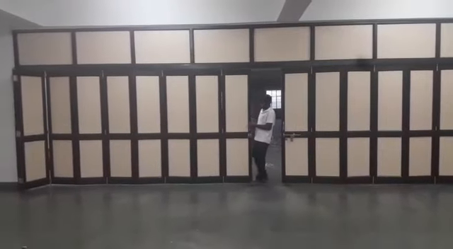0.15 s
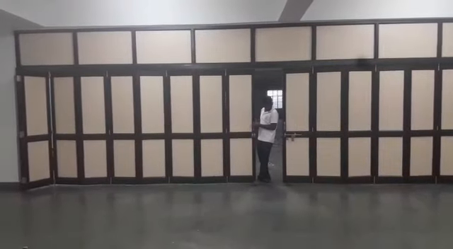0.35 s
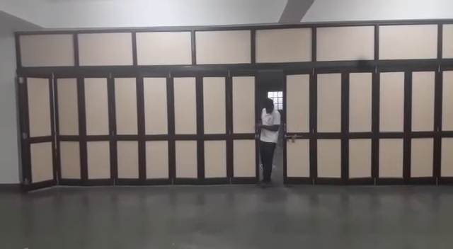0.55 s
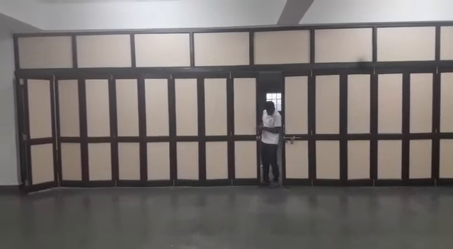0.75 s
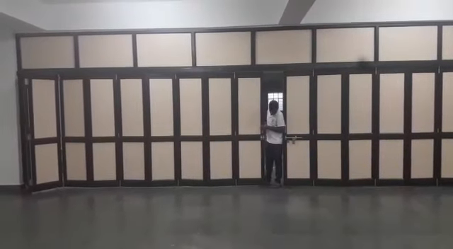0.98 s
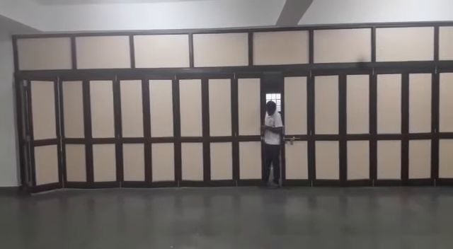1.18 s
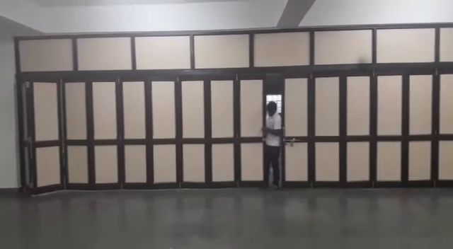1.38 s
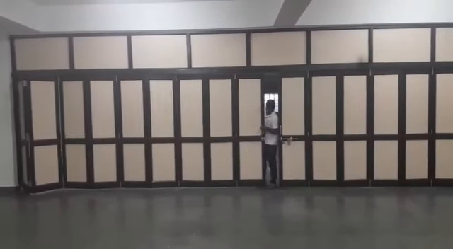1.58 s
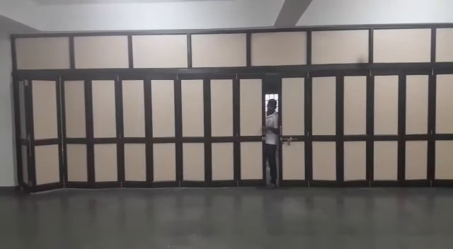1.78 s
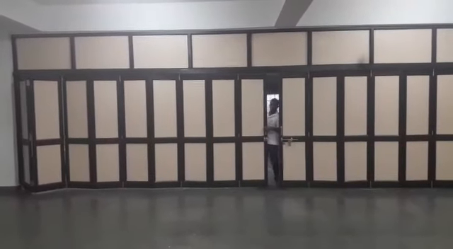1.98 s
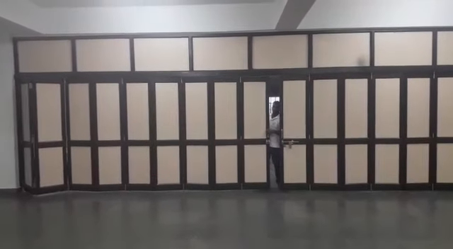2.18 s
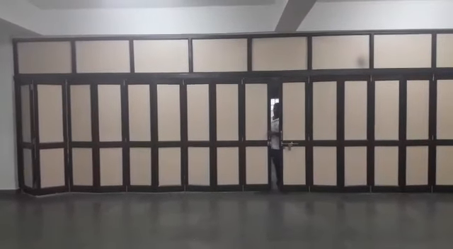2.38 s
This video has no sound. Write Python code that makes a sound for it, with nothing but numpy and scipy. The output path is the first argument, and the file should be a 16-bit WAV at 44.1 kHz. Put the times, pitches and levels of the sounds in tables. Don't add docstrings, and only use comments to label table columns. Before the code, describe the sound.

A folding panel door slams in a large empty hall, heard from afar on a phone. Wheels rumble and hiss over hall murmur from the start. At 0.2 seconds a metal catch clacks and bounces; at 0.69 panels slam hard, rattling and booming until about 0.8. Reverberation fades over softer rolling; gritty edge rubbing rises faintly after 1.9, with a tiny tick at 2.4.

```python
import sys
import numpy as np
from scipy import signal
from scipy.fft import rfft, irfft, next_fast_len
from scipy.io import wavfile
from scipy.ndimage import uniform_filter1d, minimum_filter1d, map_coordinates

SR = 44100
rng = np.random.default_rng(int(sys.argv[2]) if len(sys.argv) > 2 else 0)


def transcribe(signal):
    frames = np.atleast_2d(signal).T
    limited = np.clip(frames, -1, 1)
    pcm = np.round(limited * 32767).astype(np.int16)
    wavfile.write(sys.argv[1], SR, pcm)


def ratio(d):
    e = np.asarray(d, float) / 20
    return 10 ** e


N = 108045
TIME_S = np.arange(N) / SR


def unit(x):
    return x / np.sqrt(np.mean(x ** 2) + 1e-20)


def along(points, hz):
    f, v = np.transpose(points)
    return np.interp(np.log(hz + 1), np.log(f + 1), v)


def over_time(points):
    return np.interp(TIME_S, *np.transpose(points))


def filtered(x, response):
    m = next_fast_len(len(x) + 8192)
    return irfft(rfft(x, m) * response(np.fft.rfftfreq(m, 1 / SR)), m)[:len(x)]


def causal(points):
    size = 4096
    gain = ratio(along(points, np.fft.rfftfreq(size, 1 / SR)))
    cepstrum = irfft(np.log(gain), size)
    cepstrum[1:size // 2] *= 2
    cepstrum[size // 2 + 1:] = 0
    return irfft(np.exp(rfft(cepstrum)), size)


def wobble(rate_hz):
    knots = rng.standard_normal(int(N * rate_hz / SR) + 4)
    return map_coordinates(knots, [np.arange(N) * rate_hz / SR])


def rush(spectrum):
    return unit(filtered(rng.standard_normal(N), lambda hz: ratio(along(spectrum, hz))))


# frequency in Hz, level in dB per Hz.
AIR_SPECTRUM = [(40, -6), (200, -4.5), (450, 1.5), (700, -3.5), (2000, 1), (3500, -11), (6000, -20),
                (15000, -49)]


def air():
    return ratio(-33 + 2.4 * wobble(5.42)) * rush(AIR_SPECTRUM)


# time in seconds, force in dB.
WHEEL_FORCE = [(0, -34), (.15, -30.5), (.5, -29.5), (.7, -35), (1.3, -32), (1.9, -37), (2.2, -37.5),
               (2.45, -38.5)]
# frequency in Hz, level in dB per Hz.
RUMBLE_SPECTRUM = [(40, -7), (90, 3), (260, 5.5), (400, -4), (1000, -24.5), (3000, -38.5)]
# frequency in Hz, level in dB per Hz.
TRACK_SPECTRUM = [(200, 7), (500, 2.5), (900, 2.5), (2000, -8.5), (3500, -13), (5800, -19), (9000, -27),
                  (15000, -33.5)]


def rolling():
    track_db, track_db_per_force_db = -2, 0.47
    force_db = over_time(WHEEL_FORCE)
    top_db = force_db.max()
    rumble = ratio(force_db + 0.5 * wobble(7.14)) * rush(RUMBLE_SPECTRUM)
    hiss_db = top_db + track_db + track_db_per_force_db * (force_db - top_db)
    hiss = ratio(hiss_db + 0.47 * wobble(17)) * rush(TRACK_SPECTRUM)
    return rumble + hiss


# frequency in Hz, t60 in seconds.
HALL_T60 = [(60, 3.5), (300, 4.2), (1000, 3.66), (2500, 2.61), (5000, 1.81), (8000, 0.93), (11000, 0.84),
            (15000, 0.84)]


def hall():
    gap_s, rise_s = 0.00133, 0.005
    hz, t, z = signal.stft(rng.standard_normal(N), SR, nperseg=256)
    decay = ratio(-60 * t / along(HALL_T60, hz)[:, None])
    tail = signal.istft(z * decay, SR, nperseg=256)[1][:N]
    tail = tail * (1 - np.exp(-np.maximum(TIME_S - gap_s, 0) / rise_s))
    return tail / np.linalg.norm(tail)


def scrape(t60_s):
    bite_s, clatter_db, clatter_hz = 0.00071, 2.2, 220
    decay_db = -60 * TIME_S / t60_s
    envelope = ratio(decay_db + clatter_db * wobble(clatter_hz)) * (1 - np.exp(-TIME_S / bite_s))
    burst = envelope * rng.standard_normal(N)
    return burst * np.linalg.norm(ratio(decay_db)) / np.linalg.norm(burst)


def resonances(ring, hz):
    total = 0
    for k, (center_hz, width_hz, db) in enumerate(ring):
        damping = 1j * hz * width_hz
        total = total + (-1) ** k * ratio(db) * damping / (center_hz ** 2 - hz ** 2 + damping)
    return total


def knocks(contacts, ring, crack, t60_s, ring_db, hall_db):
    blows = np.zeros(2 * N)
    split_hz = 4700
    high = signal.butter(2, split_hz, "high", fs=SR)
    low = signal.butter(2, split_hz, fs=SR)
    for start_s, db, thin in contacts:
        direct = scrape(t60_s)
        heard = direct + ratio(hall_db) * np.linalg.norm(direct) * hall()
        thin = np.clip(thin, -1, 1)
        share = abs(thin)
        coloured = signal.lfilter(*(high if thin > 0 else low), heard)
        blow = (1 - share) * heard + share * coloured
        blows[round(start_s * SR):][:N] += ratio(db) * blow
    blows = blows[:N]
    cracked = signal.fftconvolve(blows, causal(crack))[:N]
    return cracked + ratio(ring_db) * filtered(blows, lambda hz: resonances(ring, hz))


# start in seconds, level in dB, thinness from -1 dull to 1 thin.
CATCH_CONTACTS = [
    (.2025, -38, 0.42),
    (.2105, -16, 0.83),
    (.2195, -19, 0.49),
    (.225, -20.5, 0.11),
    (.232, -23, 0.17),
    (.245, -42.5, 0.45),
    (.27, -32.5, 0.05),
    (.292, -32.5, .5),
    (2.414, -40, 1),
]
# frequency in Hz, width in Hz, level in dB.
CATCH_MODES = [(186, 62, 4), (453, 132, 11), (1220, 160, 2), (2100, 150, -23), (2460, 230, -0.5),
               (3290, 92, 3.5), (5540, 360, -4), (6200, 180, -16), (8160, 230, -8.5), (12300, 1200, 4.5),
               (15300, 500, 2)]
# frequency in Hz, level in dB.
CATCH_COLOUR = [(60, 0), (250, -4.5), (750, -1), (2000, 6), (4500, -1.5), (5700, -3.5), (9500, -5.5),
                (12500, -5)]


def catch():
    return ratio(10.5) * knocks(CATCH_CONTACTS, CATCH_MODES, CATCH_COLOUR, t60_s=0.046, ring_db=1.1, hall_db=3.5)


# start in seconds, level in dB, thinness from -1 dull (or below) to 1 thin.
SLAM_CONTACTS = [
    (.669, -40, -.9),
    (.679, -22, -1.62),
    (.6885, -10.5, -0.16),
    (.692, -8, 0.13),
    (.703, -10, 0.11),
    (.711, -18.5, 0.44),
    (.721, -10, 0.079),
    (.75, -22, 0.26),
    (.775, -18, -0.27),
    (.807, -19, -1.1),
]
# frequency in Hz, width in Hz, level in dB.
PANEL_MODES = [(134.4, 15.7, 0), (195, 29, 0), (430, 46, -4.5), (531, 33, 3.5), (1224, 34, -8),
               (1364, 17, 0), (1530, 45, -7), (1963, 178, 2), (2620, 330, -4.5), (4069, 225, -0.5),
               (5400, 500, -22.5), (6336, 130, -20), (11020, 1100, -6.5), (14400, 1200, 0)]
# frequency in Hz, level in dB.
PANEL_COLOUR = [(60, -25), (300, -2.5), (700, -3.5), (2300, -6), (3300, -6.5), (6000, -5), (11000, -11),
                (13300, -3.5)]


def slam():
    return ratio(8.5) * knocks(SLAM_CONTACTS, PANEL_MODES, PANEL_COLOUR, t60_s=0.048, ring_db=4.5, hall_db=10.5)


# frequency in Hz, level in dB, t60 in seconds.
BENDING_MODES = [(135.8, -22, 0.36), (171, -16.5, 0.13), (208.3, -20, 0.411), (406.4, -17.5, .35),
                 (442.7, -15, 0.22)]
# start in seconds, level in dB.
BENDING_BLOWS = [
    (.69, -0.5),
    (.76, -7),
    (.805, 0.5),
]


def flex():
    boom, t = np.zeros(2 * N), np.arange(SR) / SR
    rise = 1 - np.exp(-t / 0.0024)
    for start_s, blow_db in BENDING_BLOWS:
        for hz, mode_db, t60_s in BENDING_MODES:
            phase = rng.uniform(0, 2 * np.pi)
            envelope = ratio(blow_db + mode_db - 60 * t / t60_s) * rise
            boom[round(start_s * SR):][:SR] += envelope * np.sin(2 * np.pi * hz * t + phase)
    return boom[:N]


# time in seconds, level in dB.
RUB_LEVEL = [(1.9, -64), (2.2, -57), (2.35, -52), (2.4, -44), (2.45, -43.5)]
# frequency in Hz, level in dB per Hz.
EDGE_SPECTRUM = [(1500, -28), (3500, 5), (5800, 12.5), (7000, -4), (10000, 0.5), (15000, -4.5)]


def rubbing():
    level_db = np.interp(TIME_S, *np.transpose(RUB_LEVEL), left=-120)
    return ratio(level_db + 2 * wobble(70)) * rush(EDGE_SPECTRUM)


def scene():
    return (air() + rolling() + catch() + slam() + flex() + rubbing())[None]


# frequency in Hz, level in dB.
MIC_RESPONSE = [(25, -48), (50, -2), (120, -1), (6500, 0), (7300, -9.5), (8300, -23.5), (13500, -31.5),
                (15000, -33)]
# frequency in Hz, level in dB per Hz.
HISS_SPECTRUM = [(6000, -31), (9000, -17), (11500, -6), (13000, -3.5), (15000, -1.5)]


def microphone(x):
    return signal.fftconvolve(x, causal(MIC_RESPONSE))[:N] + ratio(-67.5) * rush(HISS_SPECTRUM)


# time in seconds, gain in dB.
SLOW_GAIN = [(0, -0.5), (.69, 0), (.8, -2), (.95, -4), (1.2, -4), (1.26, -5), (1.8, -4.5), (2.45, -0.5)]


def gain_control(x):
    return x * ratio(over_time(SLOW_GAIN))


def limiter(x):
    limit_db, hold_s, release_db_per_s = -0.35, 0.003, 250
    fall_db = release_db_per_s * TIME_S
    over_db = np.maximum(20 * np.log10(np.abs(x) + 1e-9) - limit_db, 0)
    cut_db = np.maximum.accumulate(over_db + fall_db) - fall_db
    look = int(hold_s * SR)
    return x * ratio(uniform_filter1d(minimum_filter1d(-cut_db, look), look))


def roll_off(x):
    return signal.sosfilt(signal.butter(12, 16840, fs=SR, output="sos"), x)


def record(dry):
    x = limiter(gain_control(microphone(dry[0])))
    top_hz = 15740
    x = filtered(x, lambda hz: hz < top_hz)
    return roll_off(x[None])


dry = scene()
out = record(dry)
transcribe(out)
```